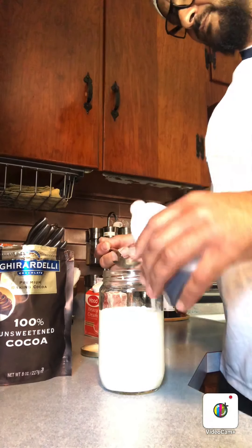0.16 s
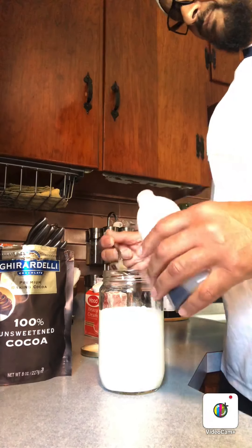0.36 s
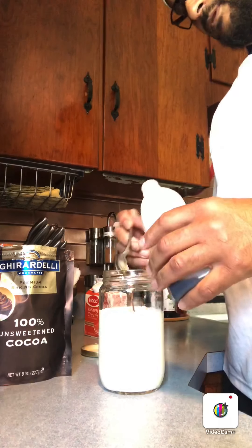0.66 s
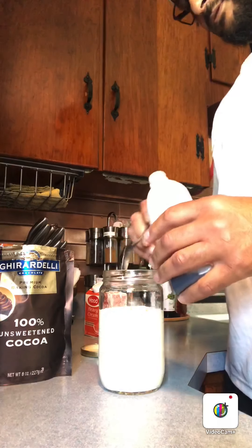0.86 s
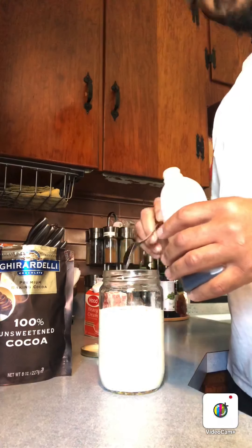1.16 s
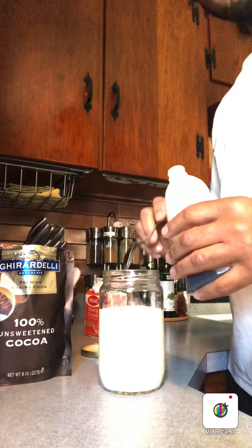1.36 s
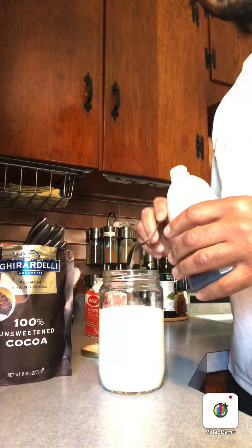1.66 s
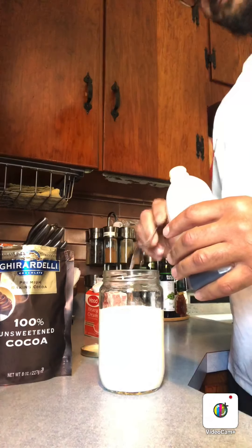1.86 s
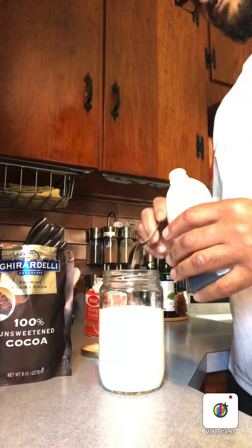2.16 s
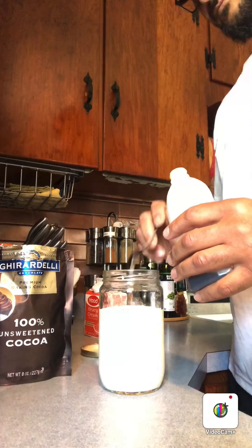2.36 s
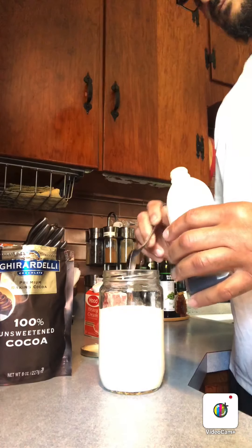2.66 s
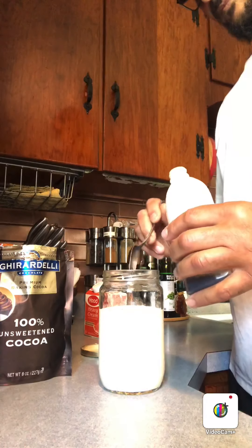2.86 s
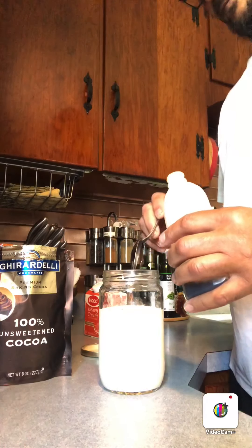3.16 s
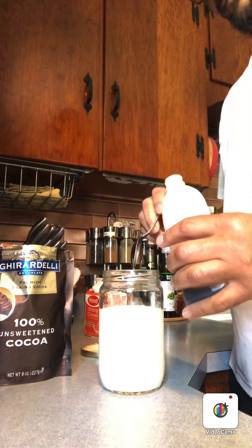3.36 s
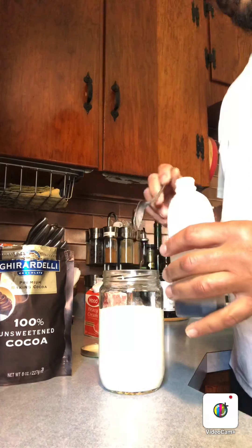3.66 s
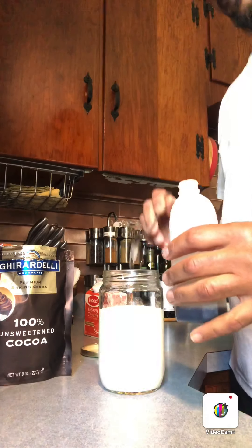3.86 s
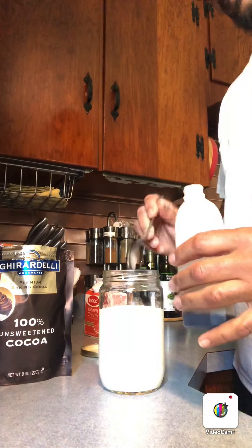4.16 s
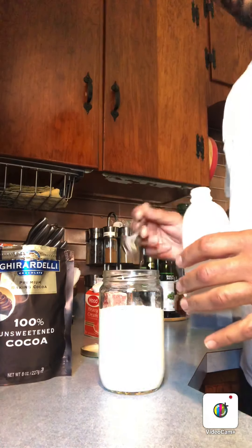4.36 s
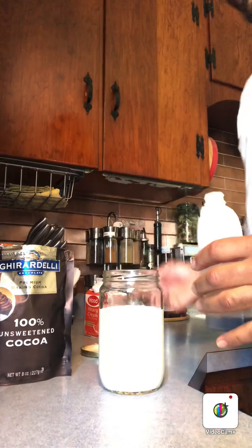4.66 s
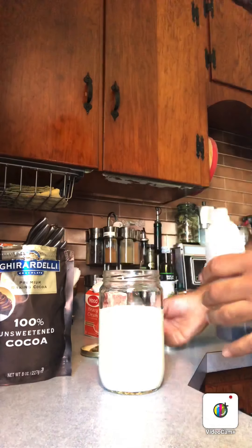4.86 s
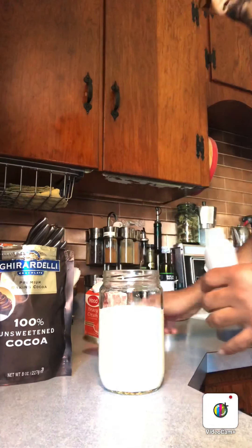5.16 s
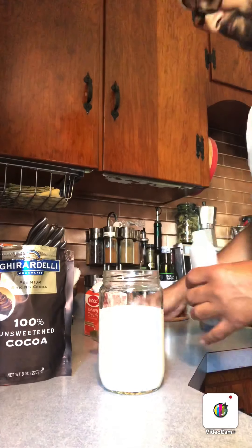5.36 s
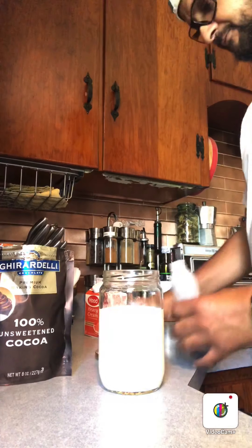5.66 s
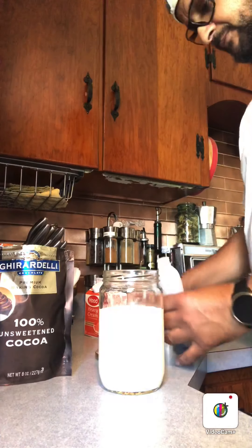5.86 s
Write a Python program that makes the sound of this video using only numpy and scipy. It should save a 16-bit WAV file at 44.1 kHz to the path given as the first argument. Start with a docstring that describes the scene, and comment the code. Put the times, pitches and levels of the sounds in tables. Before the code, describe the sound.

Quiet small kitchen, steady low rumble and faint fridge hum. A dry spoon knock in a jar, then about two seconds of regular, sharp glass clinks with soft rebounds, close and loud. The spoon slides lightly along the rim, then after a pause strikes once more. It lands on the counter with a small bounce; metal pieces scrape and jingle slightly farther away, ending with a hollow plastic bottle knock and two stiff clicks.

```python
"""Spoon and milk jar, kitchen counter

Close at the microphone a metal spoon dips into a glass jar of milk, is tapped on the rim, then wiped along it.
Each tap clicks, rings as dying sines, and sends a falling thud through the counter top as bending waves;
softer rebounds follow. Further back the spoon is put down, metalware is dragged rattling over the counter,
and a plastic bottle knocks and snaps: shaped bursts of micro-contacts with resonances.
Behind all this lie steady room rumble and a wavering refrigerator hum, both made of filtered noise and sines."""
import sys
import numpy as np
from scipy import signal
from scipy.fft import rfft, irfft
from scipy.io import wavfile
from scipy.ndimage import uniform_filter1d, minimum_filter1d

SR = 44100
rng = np.random.default_rng(int(sys.argv[2]) if len(sys.argv) > 2 else 0)


def master_out(mix):
    """Clip the mix to full scale and print it as 16-bit PCM to the path in sys.argv[1]."""
    frames = np.transpose(np.atleast_2d(mix))
    ceiling = np.clip(frames, -1, 1)
    pcm = np.round(ceiling * 32767).astype(np.int16)
    wavfile.write(sys.argv[1], SR, pcm)


N = 265584
TIME = np.arange(N) / SR  # s

# Levels in the tables are relative; each source sets its own mix level.
# taps on the rim: (t/s, strength/dB, scuff re strength/dB, rebound delay/s, rebound re tap/dB)
TAPS = [(.9552, -5, -3.5, 0.028, -10.5), (1.1447, 1, -1.5, .025, -10.5), (1.3255, -4.5, -29, 0.009, -22),
        (1.476, -1, -1, 0.018, -5.5), (1.6431, -0.5, -1, .0267, -8), (1.803, 1, -3, 0.024, -12.5),
        (1.975, -1.5, 6, 0.024, -14.5), (2.143, -0.5, 2, 0.04, -45.5), (2.295, -0.5, 3.5, 0.025, -10),
        (2.4486, 0.5, 0, 0.022, -7.5), (2.5944, -1.5, -1.5, .018, -25), (3.696, 1, 1.5, 0.02, -8.5)]
# spectrum of the tap's click: (f/Hz, level/dB)
CLICK = [(300, -30.5), (900, 10), (1400, 12), (1850, 6), (2450, -17.5), (2850, 9.5), (3350, 15), (4000, -8),
         (5300, 1), (6300, 13.5), (7300, 7.5), (8200, -7), (10900, -6.5), (12500, -18.5), (14000, -44),
         (16000, -46), (18000, -73.5)]
# scuff of metal on glass: (f/Hz, level/dB)
TAP_EDGE = [(2300, -33.5), (2850, 13.5), (3350, 12), (4000, 3.5), (5200, -8), (6500, -16), (10000, -49),
            (16000, -81.5)]
# thud of the counter top: (f/Hz, level/dB)
THUD = [(50, -48.5), (110, -10), (190, -2), (320, 0.5), (480, 2), (680, -2), (1100, 0.5), (1450, 0),
        (2400, -0.5)]
# low bump of the counter: (f/Hz, level/dB)
BUMP = [(45, -16), (80, -4.5), (120, 10.5), (175, -0.5), (260, -12), (900, -8)]
# paths through the counter top, straight and by way of its edges: (relative length, gain)
SLAB_PATHS = [(1, 1), (1.496, -0.13), (2.199, 0.22), (3.101, -0.21)]
# lower clear note of spoon and jar: (f/Hz, level/dB, t60/s)
MAIN_NOTE = [(1622, -10, .08), (1634, 0, .125), (1690, -18, .07)]
# higher clear note of spoon and jar: (f/Hz, level/dB, t60/s)
HIGH_NOTE = [(5015, 0, .25), (13095, -14, .14)]
# short overtones of spoon and jar: (f/Hz, level/dB, t60/s)
OVERTONES = [(1016, 3, 0.051), (2666, 2.5, 0.1), (3400, -32, 0.023), (4347, 3.5, 0.046), (6590, 3, 0.046),
             (6760, 0, .045), (7010, 0, 0.029), (7460, 0, 0.046), (8730, 1.5, .06), (9150, -8, .08),
             (10370, -5.5, .06)]
# the whole jar is jolted against the counter: (t/s, level/dB, bump f/Hz)
JOLTS = [(.2197, -1, 120), (3.696, -3, 169)]
# the dipping spoon knocks inside the jar's neck: (t/s, level/dB)
DIPS = [(.2197, -7), (0.5103, -30), (.543, -36.5), (0.6782, -33.5)]
# spectrum of those knocks: (f/Hz, level/dB)
DIP_COLOUR = [(300, -41), (900, 3.5), (1300, 3), (1680, 15), (2200, -7), (2700, 8), (3250, 9.5),
              (4000, -0.5), (6300, -2.5), (9000, -13.5), (12000, -33), (16000, -34)]
# ring of the held spoon: (f/Hz, level/dB, t60/s)
DIP_MODES = [(1657, -4, 0.14), (2710, -10, .1), (2790, -11, .2), (3350, -10, 0.094), (5044, -8, .12)]
# pressure of the spoon sliding on the rim: (t/s, level/dB)
WIPE = [(2.66, -47.5), (2.72, -41), (2.92, -39), (3.0, -56.5), (3.06, -46), (3.11, -52), (3.26, -40),
        (3.35, -61.5)]
# contact resonance of the slide: (t/s, f/Hz)
WIPE_PITCH = [(2.66, 880), (2.81, 844), (2.96, 1053), (3.04, 1370), (3.3, 1406)]
# hiss of the slide: (f/Hz, level/dB)
WIPE_HISS = [(400, -71.5), (900, 13), (1700, 13), (2400, -10.5), (3000, 6), (3800, -6.5), (4700, -10.5),
             (6000, 0.5), (7500, -14.5), (10000, -18), (15000, -41)]
# the sliding spoon catches and lets go: (t/s, level/dB)
CATCHES = [(3.177, -10)]
# milk plops: (t/s, level/dB, f/Hz)
PLOPS = [(.378, -26, 746), (.381, -29, 916), (.387, -32, 800)]
# what the jar throws into the room: (f/Hz, level/dB)
JAR_SPREAD = [(300, 4), (1000, 1.5), (1900, 1), (2900, -5), (4200, 0), (6500, -3), (9000, 2), (13000, -0.5),
              (16000, -22)]
# the spoon lands on the counter and bounces: (t/s, level/dB, treble level/dB)
LANDING = [(4.7612, -6.5, -22), (4.7638, -2.5, -10), (4.797, -12.5, -29), (4.839, -28, -26.5)]
# body of the landing: (f/Hz, level/dB)
LANDING_BODY = [(150, -15), (600, -12), (870, -4), (1150, 1), (1700, 1), (2250, -3.5), (3000, -3),
                (4100, -7), (6000, -39), (12000, -60)]
# bright edge of the landing: (f/Hz, level/dB)
LANDING_EDGE = [(1500, -21), (2800, -7.5), (4100, 0.5), (5500, -1.5), (7200, 0.5), (9000, -3), (11000, -13),
                (15500, -29)]
# the dragged metal jumps and knocks: (t/s, level/dB, treble level/dB, free ring level/dB)
KNOCKS = [(5.278, -14.5, -25.5, -33), (5.363, -21.5, -35, -56), (5.4222, -9, -14.5, -32),
          (5.4435, -3, -15, -22), (5.447, -3, -3.5, -15), (5.466, -5.5, -5.5, -6), (5.514, -6, -9.5, -6),
          (5.530, -10.5, -12, -1), (5.56, -8.5, -10.5, -27), (5.58, -14.5, -12, -38),
          (5.595, -8.5, -29, -18), (5.661, -21.5, -29.5, -42)]
# body of the knocks: (f/Hz, level/dB)
KNOCK_BODY = [(120, -17.5), (250, -16), (700, -4.5), (1100, -1.5), (1750, -4), (2300, -2.5), (3000, -1.5),
              (4000, -5.5), (5000, -51), (7000, -33), (12000, -69)]
# bright edge of the knocks: (f/Hz, level/dB)
KNOCK_EDGE = [(2500, -20), (4000, 4.5), (5500, 2), (7200, 2.5), (9000, -2), (11000, -11.5), (15500, -27)]
# force of the drag over the counter: (t/s, level/dB)
DRAG = [(5.3, -52), (5.415, -26), (5.445, -24), (5.61, -22.5), (5.69, -37.5)]
# spectrum of the drag: (f/Hz, level/dB)
DRAG_COLOUR = [(60, -17), (110, 21), (200, -18), (450, 9), (1200, -1), (2000, 2), (3000, 3), (4100, -7.5),
               (5600, -7.5), (7300, -19.5), (9500, -34), (11400, -24), (12400, -24), (13500, -24),
               (16000, -29)]
# jingle of the jumping metal: (f/Hz, level/dB, t60/s)
METAL = [(3097, -9, .25), (3697, -6, .28), (4080, -5, .22), (5372, 2, .25), (6428, -7, .2), (6465, -4, .25),
         (8608, -3, .2), (8797, -3, .22), (9080, -2, .25), (9250, -6, .25), (9573, -3, .22),
         (12070, -14, .18), (12805, -9, .2), (13837, -15, .22)]
# note the metal sings when dragged or touched: (f/Hz, level/dB, t60/s)
METAL_NOTE = [(7936, 0, .3), (7975, -9, .15), (4064, -11, .15)]
# the bottle is set down: (t/s, level/dB)
BOTTLE = [(5.877, -17)]
# hollow knock of the bottle: (f/Hz, level/dB)
BOTTLE_COLOUR = [(100, -14), (500, -11.5), (1100, 1.5), (2000, 0), (3000, -16), (4300, -10), (7000, -20),
                 (15000, -30)]
# plastic snaps: (t/s, level/dB)
SNAPS = [(5.9294, -10), (5.956, -12.5)]
# resonances of the stiff plastic: (f/Hz, level/dB)
PLASTIC = [(500, -21), (1200, -8.5), (2500, -0.5), (3300, -8.5), (3700, -4.5), (4020, 9.5), (4400, -2),
           (4950, -3), (5250, 3.5), (5700, -3.5), (6200, -15), (9000, -21.5), (15000, -42)]
# light ticks of handling: (t/s, level/dB)
TICKS = [(.119, -40), (.406, -44), (4.15, -40), (4.307, -44), (4.351, -35), (4.993, -56.5)]
# fingers and bottle brush over surfaces: (t/s, length/s, level/dB)
BRUSHES = [(0.08, 0.042, -69), (3.365, 0.12, -55.5), (4.344, 0.025, -49.5), (4.935, 0.092, -51),
           (5.877, 0.046, -32.5)]
# spectrum of ticks, brushing and the catch's scratch: (f/Hz, level/dB)
BRUSH_COLOUR = [(300, 0.5), (1000, 4), (2200, 6), (3500, 2.5), (5000, 4), (9000, -3.5), (12000, -19.5),
                (16000, -28.5)]
# early reflections from counter, wall and cupboards: (delay/s, gain)
ECHOES = [(.0012, 0.083), (.0031, 0.7), (.0062, 0.37), (.0098, .14), (0.0137, 0.16)]
# decay of the kitchen: (f/Hz, t60/s)
ROOM_T60 = [(120, 0.37), (400, 0.2), (1200, 0.35), (3000, 0.36), (7000, 0.29), (14000, 0.34)]
# spectrum of the room rumble: (f/Hz, level/dB)
FLOOR = [(20, -38.5), (32, -14), (50, -3.5), (80, -10), (160, -10), (250, -21.5), (420, -20), (700, -23),
         (1000, -31), (2200, -41), (3300, -39.5), (4500, -45), (8600, -49), (12000, -61), (16000, -79)]
# refrigerator hum: (f/Hz, level/dB)
HUM = [(48.4, -52.5), (180, -59.5), (360.7, -69), (425, -63.5), (651, -73.5), (750, -66), (3558, -74.5),
       (5313, -82)]

THUD_GROWTH, RING_GROWTH = 1.76, 0.43  # dB per dB of strength: a harder tap adds much thud, little ring
REBOUND_HZ = 7500  # low-pass: the softer second contact is duller
CATCH_DB, CATCH_HISS_DB = 15, -9  # the jerk in the contact resonance and its scratch
SING_DB, TOUCH_DB = -35, -20  # how strongly drag and knocks sound the metal's note
EDGE_HZ = 16100  # upper band limit


def taps(click_db=4, chatter_db=0, edge_db=1, thud_db=9, bump_db=-23, rebound_click_db=6, rebound_thud_db=-5):
    """Each blow clicks, chatters briefly, and pushes the jar into the counter; rebounds are softer and duller."""
    hits, rebounds = tap_blows()
    pushes, _ = tap_blows(THUD_GROWTH)
    s, strength, scuff, _, _ = np.transpose(TAPS)
    fallback = signal.lfilter(*signal.butter(2, REBOUND_HZ, fs=SR), scuffs(rebounds, t60=0.011))

    contact = amp(click_db) * hits + amp(rebound_click_db) * fallback
    contact += amp(chatter_db) * scuffs(hits, t60=0.0084)
    edge = scuffs(blows(s, strength + scuff + edge_db), t60=0.0053)
    out = through(contact, colour(CLICK)) + through(edge, colour(TAP_EDGE))

    out += through(amp(bump_db) * pushes, counter(BUMP))
    thuds = amp(thud_db) * pushes + amp(rebound_thud_db) * rebounds
    return out + through(thuds, counter(THUD))


def chime(main_db=-12, high_db=-30, overtone_db=-29, rebound_main_db=-11, rebound_overtone_db=-25):
    """Spoon and jar ring on after each tap; the rebound falls in step with the main note and renews it."""
    hits, rebounds = tap_blows(RING_GROWTH, period=1 / MAIN_NOTE[1][0])
    out = through(amp(main_db) * hits + amp(rebound_main_db) * rebounds, ring(MAIN_NOTE))
    out += amp(high_db) * through(hits + .5 * rebounds, ring(HIGH_NOTE))
    overtones = amp(overtone_db) * hits + amp(rebound_overtone_db) * rebounds
    return out + through(overtones, ring(OVERTONES))


def tap_blows(growth=1, period=1 / SR):
    """Impulses of taps and rebounds, spaced by whole periods; growth is dB of response per dB of strength."""
    s, strength, _, delay, softer = np.transpose(TAPS)
    rebound_s = s + period * np.round(delay / period)
    return blows(s, growth * strength), blows(rebound_s, growth * strength + softer)


def jolts():
    """The jar pushes the counter: its low bump, moved to the pitch of each jolt."""
    out = np.zeros(N)
    for s, db, hz in JOLTS:
        moved = [(f * hz / BUMP[2][0], level) for f, level in BUMP]
        add(out, s, amp(db) * counter(moved))
    return out


def dips(click_db=13, chatter_db=9, ring_db=-17):
    """Held against the glass, the spoon gives a dry knock with little ring."""
    hits = blows(*np.transpose(DIPS))
    contact = amp(click_db) * hits + amp(chatter_db) * scuffs(hits, t60=0.08)
    return through(contact, colour(DIP_COLOUR)) + amp(ring_db) * through(hits, ring(DIP_MODES))


def wipe(contact_db=-2, overtone_db=-11, ring_db=-8, hiss_db=-7, width_hz=220):
    """Tiny slips excite a resonance that mostly rises as the contact point moves along the spoon."""
    slips = rng.choice([-1., 1.], N) * (rng.random(N) < 2500 / SR)  # about 2500 per second
    pitch = np.interp(TIME, *np.transpose(WIPE_PITCH))
    contact = resonate(resonate(slips, pitch, width_hz), pitch, width_hz)
    slide = amp(contact_db) * evened(contact)
    slide += amp(overtone_db) * evened(resonate(slips, pitch * 2, 113.33))
    slide += amp(ring_db) * evened(through(slips, ring(MAIN_NOTE)))
    slide += amp(hiss_db) * evened(through(slips, colour(WIPE_HISS)))
    slide *= amp(np.interp(TIME, *np.transpose(WIPE), left=-120, right=-120))

    catches = scuffs(blows(*np.transpose(CATCHES)), t60=.008)
    jerks = amp(CATCH_DB) * resonate(catches, pitch, width_hz)
    jerks += amp(CATCH_HISS_DB) * through(catches, colour(BRUSH_COLOUR))
    return jerks + slide


def plops(t60=0.036):
    """Small air pockets ring as the spoon meets the milk."""
    out = np.zeros(N)
    for s, db, hz in PLOPS:
        add(out, s, ring([(hz, db, t60)]))
    return out


def landing():
    """The spoon is dropped on the counter and bounces as a few chattering knocks."""
    return clatter(LANDING, LANDING_BODY, LANDING_EDGE,
                   body_db=15, edge_db=20, thump_db=5.5, body_t60=0.02, edge_t60=0.068)


def metalware(drag_db=-8, jingle_db=-21):
    """Chattering knocks and a gritty drag over the counter set the metal ringing."""
    grit = evened(rng.standard_normal(N) * (rng.random(N) < 700 / SR))  # about 700 grains per second
    grit *= amp(np.interp(TIME, *np.transpose(DRAG), left=-120, right=-120))
    out = clatter(KNOCKS, KNOCK_BODY, KNOCK_EDGE,
                  body_db=14.5, edge_db=19.5, thump_db=-1, body_t60=0.021, edge_t60=0.1)
    out += amp(drag_db) * through(grit, colour(DRAG_COLOUR))
    s, _, _, jingle = np.transpose(KNOCKS)
    out += through(blows(s, jingle + jingle_db), ring(METAL))
    touches = blows(s, .5 * jingle + TOUCH_DB)  # the piece sings even at a light touch
    return out + through(amp(SING_DB) * grit + touches, ring(METAL_NOTE))


def clatter(knocks, body_colour, edge_colour, body_db, edge_db, thump_db, body_t60, edge_t60):
    """Metal on the counter: each knock is a chattering body, a longer bright edge and a low thump."""
    body, edge = np.zeros(N), np.zeros(N)
    for s, db, treble, *_ in knocks:
        add(body, s, amp(db + body_db) * chatter(body_t60))
        add(edge, s, amp(treble + edge_db) * chatter(edge_t60))
    s, db = np.transpose(knocks)[:2]
    thumps = through(blows(s, db + thump_db), counter(BUMP))
    return through(body, colour(body_colour)) + through(edge, colour(edge_colour)) + thumps


def bottle(knock_db=17, thump_db=10, snap_db=15, rattle_db=12):
    """A hollow knock thumps the counter, then stiff plastic snaps twice with a rattle."""
    knock, snaps = blows(*np.transpose(BOTTLE)), blows(*np.transpose(SNAPS))
    out = amp(knock_db) * through(knock, colour(BOTTLE_COLOUR))
    thump = counter([(50, -9), (115, -4), (220, 1), (520, 23), (1200, -24)])  # (f/Hz, level/dB)
    out += amp(thump_db) * through(knock, thump)
    clicks = amp(snap_db) * snaps + amp(rattle_db) * through(snaps, chatter(0.0098))
    return out + through(clicks, colour(PLASTIC))


def handling(tick_db=14):
    """Faint ticks are micro-contact bursts; soft brushing is noise that swells and fades."""
    out = np.zeros(N)
    for s, db in TICKS:
        add(out, s, amp(db + tick_db) * chatter(0.0048))
    for s, length, db in BRUSHES:
        window = np.hanning(round(length * SR))
        add(out, s, amp(db) * window * rng.standard_normal(len(window)))
    return through(out, colour(BRUSH_COLOUR))


def kitchen(x):
    """Diffuse tail of the room: sparse reflections, each band dying at its own speed."""
    t = TIME[:SR]
    reflections = rng.choice([-1., 1.], SR) * (rng.random(SR) < 5000 / SR) * (t > .006)
    hz, frame_s, z = signal.stft(reflections, SR, nperseg=256)
    decay = amp(-60 * frame_s / read(ROOM_T60, hz)[:, None])
    tail = signal.istft(z * decay, SR, nperseg=256)[1]
    return through(x, tail / np.linalg.norm(tail))


def background(rumble_db=-46, waver=0.95):
    """Steady room rumble is shaped noise; the refrigerator hum is sines wavering slowly in level and phase."""
    hz = np.fft.rfftfreq(N, 1 / SR)
    rumble = irfft(rfft(rng.standard_normal(N)) * amp(read(FLOOR, hz)), N)
    out = amp(rumble_db) * evened(rumble)
    for f, db in HUM:
        drift = evened(irfft(rfft(rng.standard_normal(N)) * (hz < 6), N))  # slower than 6 Hz
        tone = np.sin(2 * np.pi * f * TIME + drift)
        out += np.sqrt(2) * amp(db) * (1 + waver * drift) * tone
    return out


def counter(points, lag=.0056, coincidence_hz=2100, size=8192):
    """Bending waves: low notes cross the counter top slower, so a blow arrives as overlapping falling chirps."""
    hz = np.fft.rfftfreq(size, 1 / SR)
    travel = lag * np.maximum(np.sqrt(coincidence_hz / np.maximum(hz, 40)), 1)  # s
    waves = 0
    for length, gain in SLAB_PATHS:
        delay = length * travel - lag * SLAB_PATHS[0][0] + 0.000535  # s, less the straight path's shortest lag
        waves = waves + gain * np.exp(-2j * np.pi * np.cumsum(delay) * SR / size)  # delay summed to phase
    shape = amp(read(points, hz)) / (1 + (hz / points[-1][0]) ** 2) ** 2  # the slab carries no treble
    h = irfft(shape * waves)[:size // 2] * signal.windows.tukey(size // 2, .01)
    return h / np.linalg.norm(h)


def ring(modes, rise_s=0.00017):
    """Sum of dying sines with a soft start."""
    t = TIME[:SR]
    tones = sum(amp(db - 60 * t / t60) * np.sin(2 * np.pi * hz * t) for hz, db, t60 in modes)
    return (1 - np.exp(-t / rise_s)) * tones


def chatter(t60):
    """A short dying burst of micro-contacts, energy 1."""
    t = TIME[:SR // 8]
    burst = rng.standard_normal(len(t)) * amp(-60 * t / t60)
    return burst / np.linalg.norm(burst)


def scuffs(hits, t60):
    """Turns every impulse into its own burst of micro-contacts."""
    out = np.zeros(N)
    for at in np.flatnonzero(hits):
        add(out, at / SR, hits[at] * chatter(t60))
    return out


def resonate(x, hz, width):
    """A resonance that follows the curve hz: shift down to 0 Hz, low-pass, shift back."""
    turn = np.exp(2j * np.pi * np.cumsum(hz) / SR)
    r = np.exp(-np.pi * width / SR)
    return (turn * signal.lfilter([1 - r], [1, -r], x / turn + 1e-18)).real


def colour(points, size=4096):
    """Causal (minimum-phase) impulse response of a spectrum, energy 1."""
    log_gain = np.log(amp(read(points, abs(np.fft.fftfreq(size, 1 / SR)))))
    h = np.fft.ifft(np.exp(np.conj(signal.hilbert(log_gain)))).real[:size // 2]
    return h / np.linalg.norm(h)


def through(x, response):
    """Passes a sound through an impulse response."""
    return signal.oaconvolve(x, response)[:N]


def blows(times, db):
    """One impulse for each blow."""
    out = np.zeros(N)
    np.add.at(out, np.round(np.asarray(times) * SR).astype(int), amp(db))
    return out


def add(mix, s, sound):
    """Mixes a sound in at time s."""
    part = mix[round(s * SR):][:len(sound)]
    part += sound[:len(part)]


def read(points, hz):
    """Reads a curve of (f/Hz, value) on a log-frequency axis."""
    f, value = np.transpose(points)
    return np.interp(np.log(hz + 1), np.log(f), value)


def evened(x):
    """Scales to rms 1."""
    return x / np.sqrt(np.mean(x ** 2) + 1e-20)


def amp(db):
    """Amplitude of a level in dB."""
    return 10 ** (np.asarray(db) / 20)


def scene(notes_wet_db=-13, jar_wet_db=-10, far_wet_db=-6):
    """The jar stands close and rings straight at the microphone; the other things lie further back."""
    notes = chime()
    jar = taps() + jolts() + dips() + wipe() + plops()
    far = landing() + metalware() + bottle() + handling()
    direct = jar + far
    out = direct + notes
    for s, gain in ECHOES:
        add(out, s, gain * direct)
    send = amp(notes_wet_db) * notes + amp(far_wet_db) * far
    send += amp(jar_wet_db) * through(jar, colour(JAR_SPREAD))
    return (out + kitchen(send) + background())[None]


def record(dry):
    """A fast limiter turns down the peaks above 0.92 of full scale; then the band limit."""
    allowed = .92 / np.maximum(abs(dry), .92)
    gain = uniform_filter1d(minimum_filter1d(allowed, size=133), size=133)  # 133 samples: 3 ms
    band = signal.firwin(401, EDGE_HZ, window=("kaiser", 9), fs=SR)
    return signal.oaconvolve(dry * gain, band[None], "same")


dry = scene()
out = record(dry)
master_out(out)
```